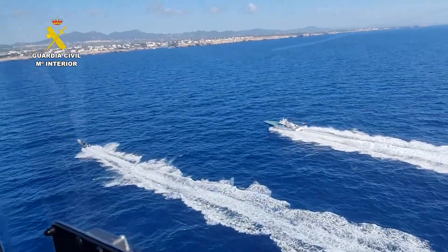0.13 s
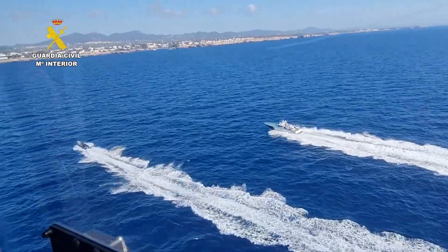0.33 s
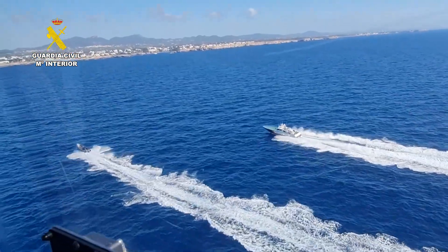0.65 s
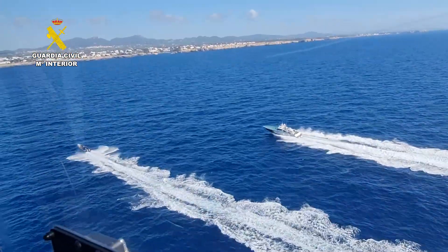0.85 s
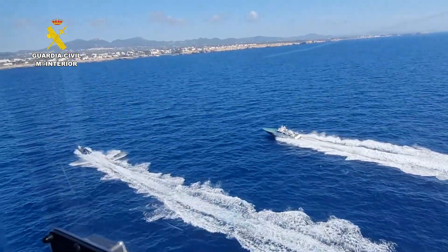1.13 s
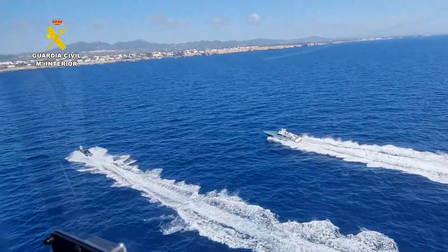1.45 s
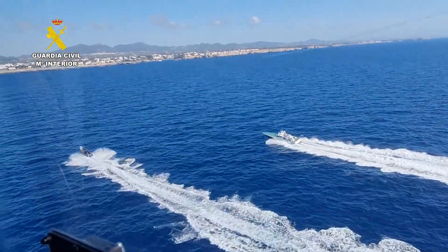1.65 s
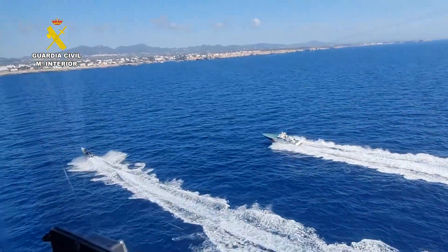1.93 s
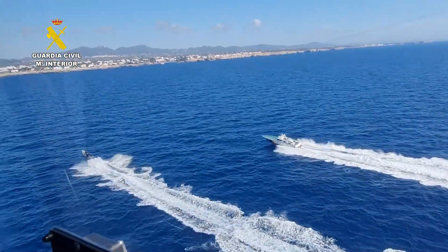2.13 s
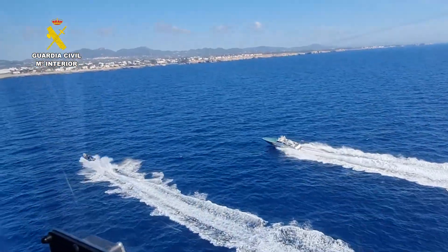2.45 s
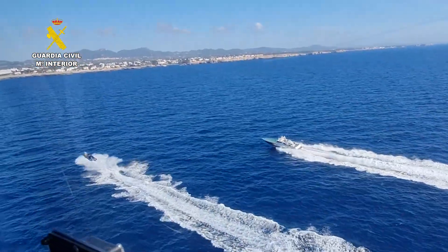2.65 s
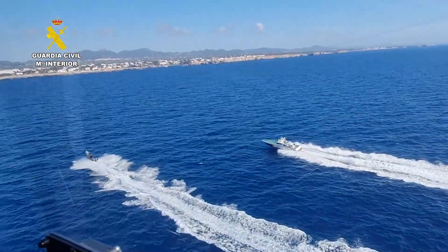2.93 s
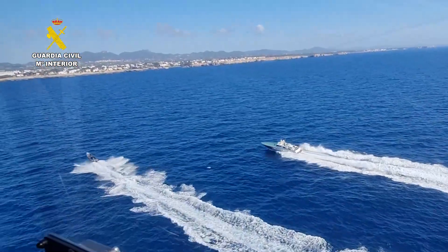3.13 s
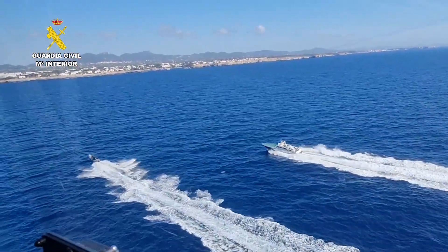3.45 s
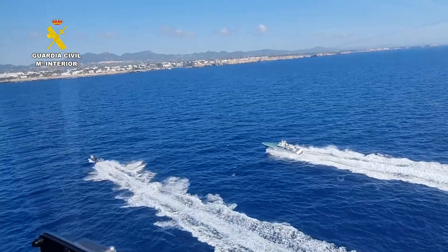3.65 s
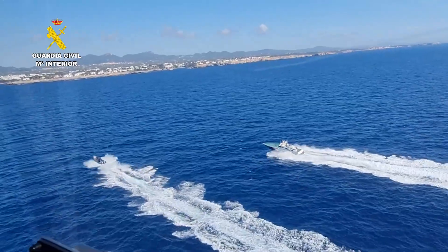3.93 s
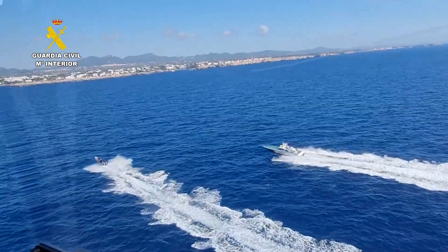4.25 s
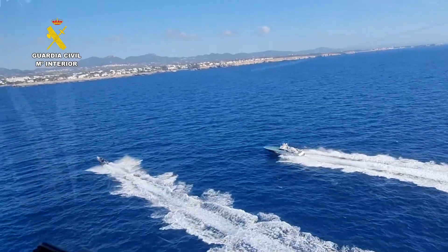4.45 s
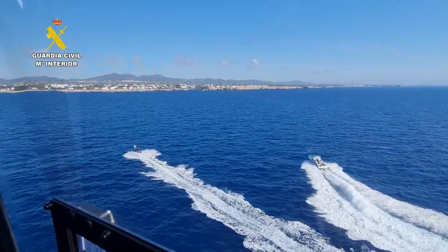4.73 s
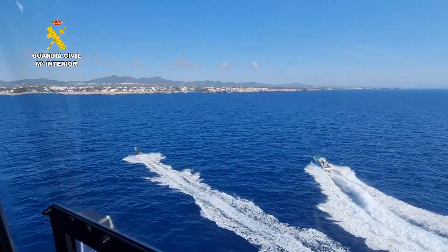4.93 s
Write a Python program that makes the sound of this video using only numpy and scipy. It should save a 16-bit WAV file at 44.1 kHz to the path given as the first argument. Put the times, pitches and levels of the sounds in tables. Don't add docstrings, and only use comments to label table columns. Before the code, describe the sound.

Heard inside a helicopter cabin in steady flight: a dense low air roar, fast deep rotor throb, ringing panels, singing gear tones and a very high blurred turbine whine. Gusts gently swell the rumble, strongest around the middle, with one tiny tick on the left. Two close microphones in the cabin; the sound stops dead near the end.

```python
import sys
import numpy as np
from scipy import signal
from scipy.fft import rfft, irfft, next_fast_len
from scipy.io import wavfile
from scipy.ndimage import uniform_filter1d

SR = 44100
rng = np.random.default_rng(int(sys.argv[2]) if len(sys.argv) > 2 else 0)


def digitize_waveform(pressure):
    field = np.atleast_2d(pressure).T
    bounded = np.clip(field, -1, 1)
    quanta = np.round(bounded * 32767).astype(np.int16)
    wavfile.write(sys.argv[1], SR, quanta)


def linear_from_db(decibels):
    return 10 ** (np.asarray(decibels, float) / 20)


N = 224733
T = np.arange(N) / SR
M = next_fast_len(N, real=True)
HZ = np.maximum(np.arange(M // 2 + 1) * SR / M, 1.)
ROTOR_HZ = 6.792


def walk(rate_hz):
    hold = int(SR / rate_hz)
    drift = np.repeat(rng.standard_normal(N // hold + 1), hold)
    drift = uniform_filter1d(uniform_filter1d(drift, hold), hold)[:N]
    return (drift - drift.mean()) / drift.std()


def white():
    return rfft(rng.standard_normal((2, M))) * np.sqrt(SR / 2)


def colour(column, table):
    table = np.array(table)
    return np.interp(np.log(HZ), np.log(table[:, 0]), table[:, column])


def blend(a, b, like):
    return like * a + np.sqrt(1 - like ** 2) * b


def ringing(table, like):
    out = 0
    for pitch_hz, width_hz, left_db, right_db in table:
        resonance = (1 + 2j * (HZ - pitch_hz) / width_hz) * np.sqrt(np.pi * width_hz / 2)
        a, b = white() / resonance
        out = out + np.array([linear_from_db(left_db) * a, linear_from_db(right_db) * blend(a, b, like)])
    return irfft(out, M)[:, :N]


def tone(pitch_hz, left_db, right_db, right_lead_rad, clock):
    phase = 2 * np.pi * (pitch_hz * clock + rng.random())
    left = linear_from_db(left_db) * np.sin(phase)
    right = linear_from_db(right_db) * np.sin(phase + right_lead_rad)
    return np.sqrt(2) * np.array([left, right])


# start_s, level_db
GUSTS = [(0, -2), (.3, 0), (.6, -.5), (.8, .5), (1.3, -1.5), (1.5, 0), (2.1, -.5), (2.25, 0.5), (2.55, 2.5),
         (2.95, 1), (3.2, 0), (3.45, -0.5), (3.7, 0), (4.0, 1.5), (4.3, .5), (4.55, -1.5), (4.7, -0.5)]


def gusts():
    start_s, level_db = np.transpose(GUSTS)
    rumble_db = np.interp(T, start_s, level_db)
    hiss_db = 0.25 * np.interp(T + 0.12, start_s, level_db)
    return rumble_db, hiss_db


# start_s, speed_change (thousandths)
SHAFT_SPEED = [(0, .2), (.6, -.5), (1.2, 0), (1.9, .1), (2.5, -.3), (3.1, .15), (3.6, .7), (4.1, .3),
               (4.7, .1)]


def shaft_clock():
    change = np.interp(T, *np.transpose(SHAFT_SPEED)) / 1000
    return np.cumsum(1 + change) / SR


# pitch_hz, left_db (per Hz), right_db (per Hz), likeness of the ports (-1 to 1)
AIR_ROAR = [(20, -57.5, -65, .9), (38, -52, -59, 0.97), (60.3, -47, -43, 0.9), (121.2, -44.5, -43, .94),
            (183, -50, -47.5, .9), (244.6, -41.5, -41.5, 0.87), (330, -48, -45, 0.72),
            (880, -57.5, -56, 0.13), (1200, -61, -57, -.25), (2130, -65, -63, 0.07), (3600, -68, -74, 0),
            (5800, -69.5, -80.5, 0), (7270, -72.5, -84, 0), (9350, -85.5, -83, 0.1)]


def air(rumble_db, hiss_db):
    like = np.clip(colour(3, AIR_ROAR), -.99, .99)
    a, b = white()
    left = a * linear_from_db(colour(1, AIR_ROAR))
    right = blend(a, b, like) * linear_from_db(colour(2, AIR_ROAR))
    roar = np.array([left, right]) * (HZ > 19) / (1 + (HZ / 9600) ** 16)
    out = 0
    for centre_hz in 20 * 2. ** np.arange(10):
        share = np.clip(1 - abs(np.log2(HZ / centre_hz)), 0, 1)
        bass = np.clip(np.log2(1800 / centre_hz) / 2, 0, 1)
        swell_db = 0.91 * bass * rumble_db + (1 - bass) * hiss_db
        flicker_db = (.5 + 0.88 * bass) * walk(9) + 1.2 * bass * walk(22)
        out = out + irfft(roar * share, M)[:, :N] * linear_from_db(swell_db + flicker_db)
    return out


# pitch_hz, width_hz, left_db, right_db
CABIN_PANELS = [(214, 32, -34, -36), (248.3, 18, -33, -27.5), (2530, 50, -39.5, -59),
                (2820, 45, -49.5, -43), (3216, 49, -49, -62.5), (4486, 70, -44, -64.5),
                (5470, 110, -45.5, -57.5), (284.5, 36, -32.5, -31), (420, 46, -34, -36),
                (585.6, 52, -32, -33.5), (803, 30, -38, -36.5), (5310, 40, -56, -67), (5690, 80, -50, -66),
                (6230, 50, -54, -74.5)]


def panels(hiss_db):
    return ringing(CABIN_PANELS, like=1.0) * linear_from_db(hiss_db)


# pitch_hz, left_db (per Hz), right_db (per Hz)
INTAKE_HISS = [
    (9100, -89, -88),
    (10080, -81, -80),
    (11800, -75.5, -83),
    (14000, -74, -76.5),
    (15600, -74.5, -83),
]
# pitch_hz, width_hz, left_db, right_db
COMPRESSOR_WHINE = [
    (12553, 55, -37.5, -41.5),
    (12540, 300, -36.2, -41),
    (12520, 1100, -43, -48),
]


def turbine(hiss_db):
    levels_db = [colour(1, INTAKE_HISS), colour(2, INTAKE_HISS)]
    hiss = irfft(white() * linear_from_db(levels_db) * (HZ > 8000), M)[:, :N]
    whine = ringing(COMPRESSOR_WHINE, like=.1)
    return (hiss + whine) * linear_from_db(hiss_db + 0.35 * walk(13))


# start_s, pitch_hz, level_db (peak), fade_s (to fall 60 dB)
LOOSE_FITTING = (2.661, 4170, -27, .06)


def tick():
    start_s, pitch_hz, level_db, fade_s = LOOSE_FITTING
    age = np.maximum(T - start_s, 0)
    ring = linear_from_db(level_db) * np.sin(2 * np.pi * pitch_hz * age) * np.exp(-np.log(1000) * age / fade_s)
    return ring * np.array([[1], [.3]])


# pitch_hz, left_db, right_db, right_lead_rad, unsteadiness_db
GEAR_TONES = [(98.8, -32, -31, -.1, 3), (241, -36, -30, .2, 3), (355.9, -37, -35, 0, 3),
              (449, -51, -41, .4, 3), (672.1, -39, -38, .8, 2), (1344.4, -53, -49, -2.5, 2),
              (2016.3, -51, -46, 1.0, 2), (726.5, -53, -43, -2.1, 3), (903.1, -44, -38, 2.9, 2.5),
              (1237.5, -51, -48, -1.4, 3), (1673.8, -51, -53, 1.6, 3), (2229.3, -55, -51, -3.1, 3),
              (2563.6, -49, -64, 1.8, 3), (2828.9, -44, -38, 2.4, 1.2), (5657.6, -47, -54, -1.5, 2.5),
              (8486.6, -75, -67, -3.0, 3), (2916.6, -57, -60, -.4, 3), (5498.5, -48, -58, 2.2, 3),
              (4660.9, -49, -62, 2.6, 2), (6991, -54, -72, 2.4, 2)]
# pitch_hz, left_db, right_db, right_lead_rad
FIRST_STAGE = (836.6, -6, 0, .9)
# rotor_turns_off_centre, left_db, right_db, right_lead_rad
MAIN_GEAR = [
    (0, -26, -36, 1.1),
    (1, -46, -63, 1.7),
    (-4, -46, -52, 1.8),
    (4, -52, -49, .7),
    (-8, -53, -50, 3.1),
    (8, -58, -58, -1.7),
]


def gearbox(clock):
    beat_db = 2.5 * np.cos(2 * np.pi * (T - .35) / 1.38)
    mesh_db = -33.5 + beat_db + walk(14)
    out = linear_from_db(0.67 * mesh_db - 7.0) * tone(*FIRST_STAGE, clock)
    for pitch_hz, left_db, right_db, lead, unsteadiness_db in GEAR_TONES:
        out = out + linear_from_db(unsteadiness_db * walk(7)) * tone(pitch_hz, left_db, right_db, lead, clock)
    main = sum(tone(2330.5 + turns * ROTOR_HZ, *rest, clock) for turns, *rest in MAIN_GEAR)
    return out + main * linear_from_db(0.41 * walk(2.6) + 1.0 * walk(16))


# start_s (middle), drop_db, length_s
BLADE_LOAD = [(0.031, 1.5, .1), (.72, -2.5, .08), (.97, 2, .1), (1.2, 5.5, .16), (1.87, -3.5, 0.13),
              (2.77, -3.5, .07), (2.891, 7, .08), (3.28, 2, .1), (3.65, 5, .16), (4.03, 7, .07),
              (4.329, 4.5, .08), (4.59, 5, .06)]
# multiple of the rotor turn, left_db, right_db, right_lead_rad
BLADE_SHAKE = [(4, -31, -28, -.5), (5, -51, -46, -.7), (8, -21, -19, -1.0), (9, -34, -32, -.2),
               (11, -33, -33, -.3), (12, -30, -30, -.3), (16, -35, -38, .4), (18, -32, -30, -.2),
               (19, -35, -33, 0), (20, -31, -32, -.2), (24, -37, -38, -.4), (32, -28, -29, .2)]


def rotor(clock):
    drops_db = sum(db * np.exp(-((T - at) / length) ** 2) for at, db, length in BLADE_LOAD)
    thump_db = 0.55 - drops_db + 0.3 * walk(12)
    out = 0
    for multiple, left_db, right_db, lead in BLADE_SHAKE:
        if multiple == 8:
            wander_db = thump_db
        else:
            wander_db = (.8 if multiple == 4 else 3.0) * walk(3)
        out = out + linear_from_db(wander_db) * tone(multiple * ROTOR_HZ, left_db, right_db, lead, clock)
    return out


def scene():
    rumble_db, hiss_db = gusts()
    clock = shaft_clock()
    background = air(rumble_db, hiss_db) + panels(hiss_db) + turbine(hiss_db)
    return background + tick() + gearbox(clock) + rotor(clock)


def band_limit(x):
    return signal.sosfilt(signal.butter(12, 15680, fs=SR, output="sos"), x)


def record(dry):
    top = 1 / (1 + (HZ / 15680) ** 400)
    ceiling = 1.25
    wet = irfft(rfft(dry, M) * top, M)[:, :N]
    wet = ceiling * np.tanh(1.074 * wet / ceiling)
    mix = wet * np.clip((4.6688 - T) / 0.0015, 0, 1)
    return band_limit(mix)


dry = scene()
out = record(dry)
digitize_waveform(out)
```